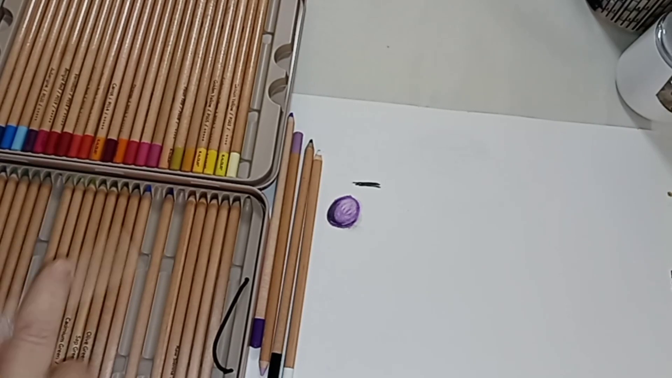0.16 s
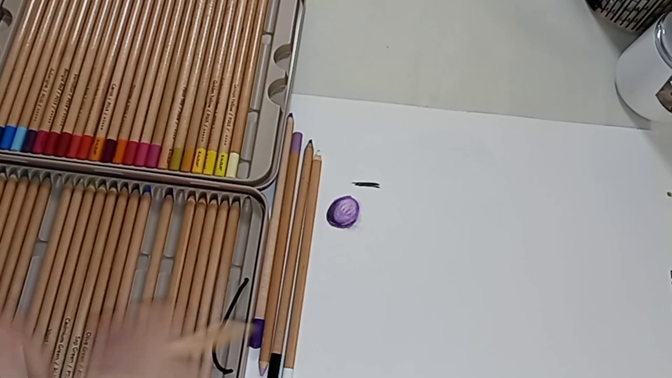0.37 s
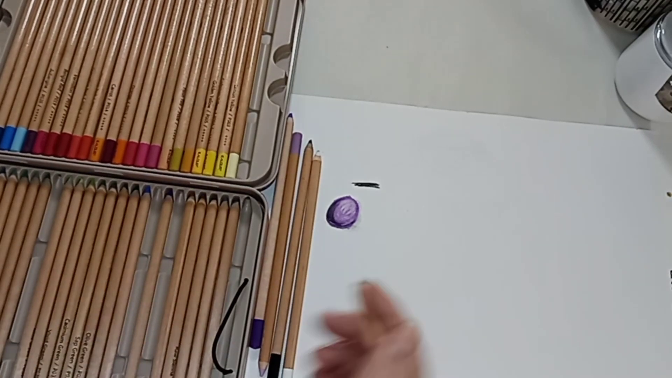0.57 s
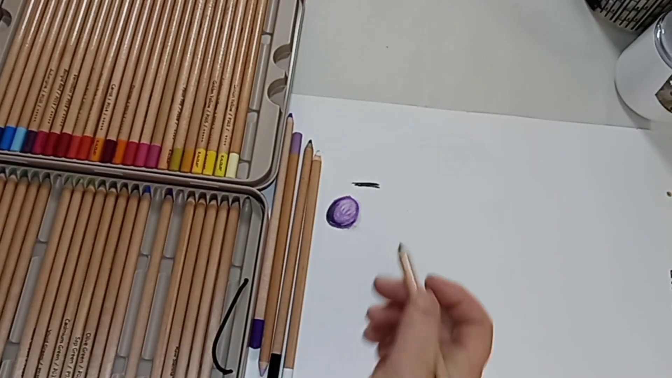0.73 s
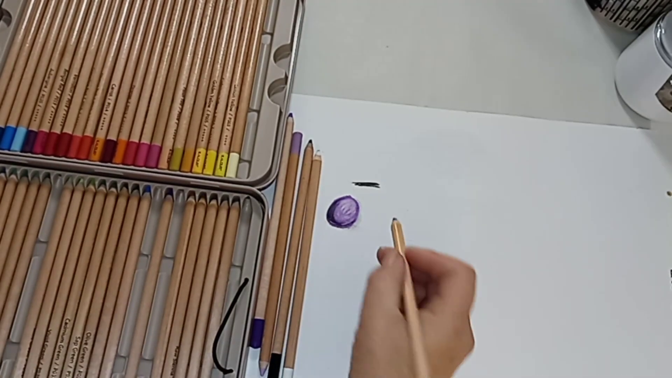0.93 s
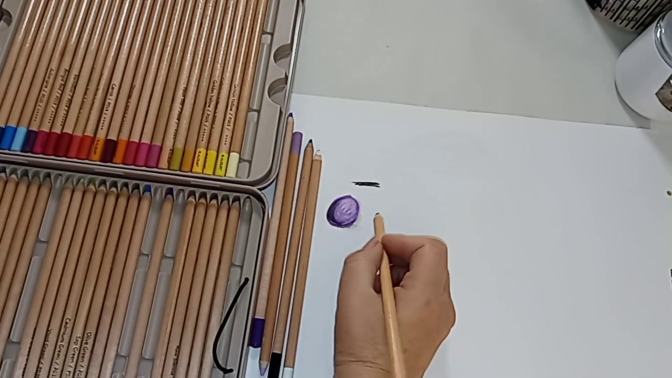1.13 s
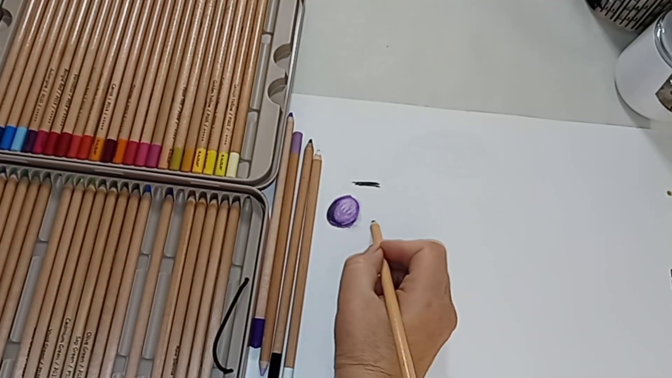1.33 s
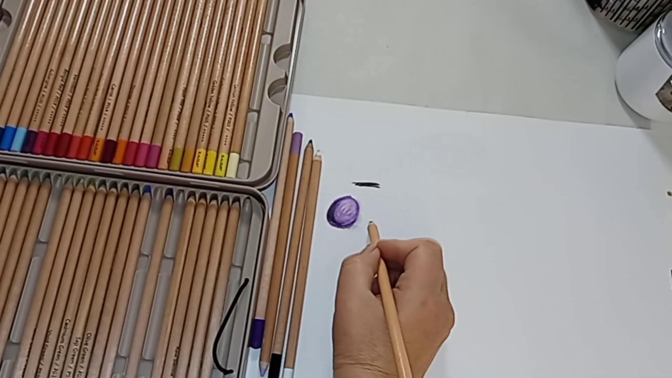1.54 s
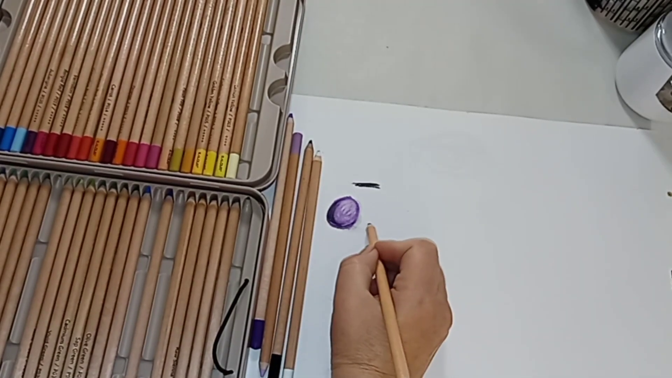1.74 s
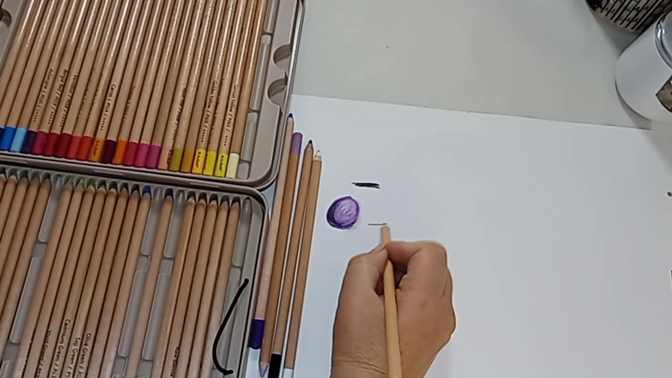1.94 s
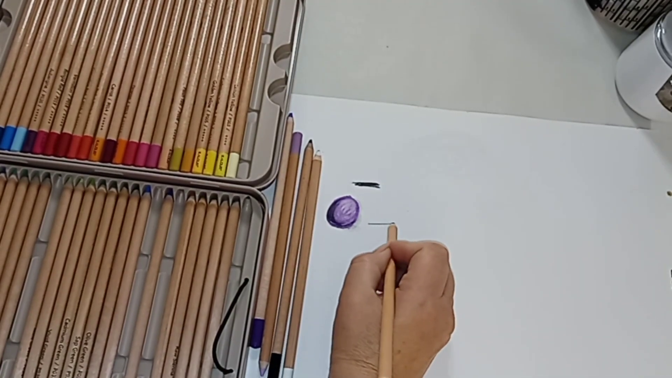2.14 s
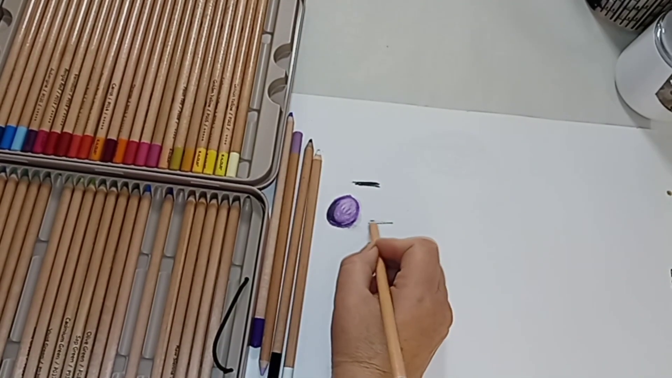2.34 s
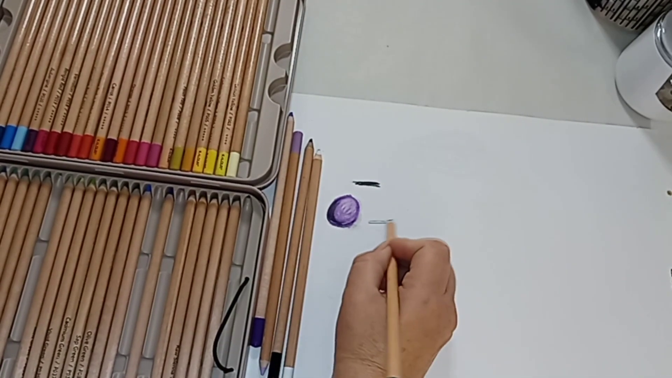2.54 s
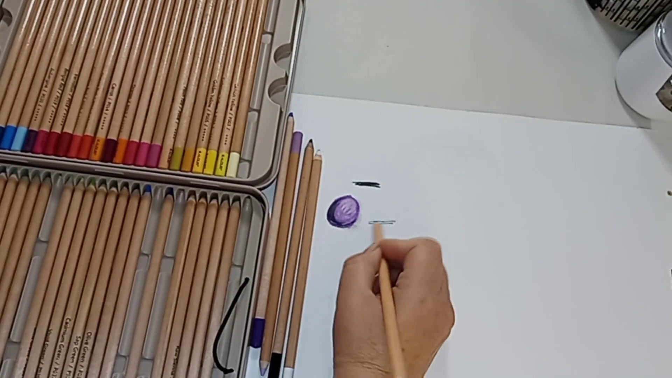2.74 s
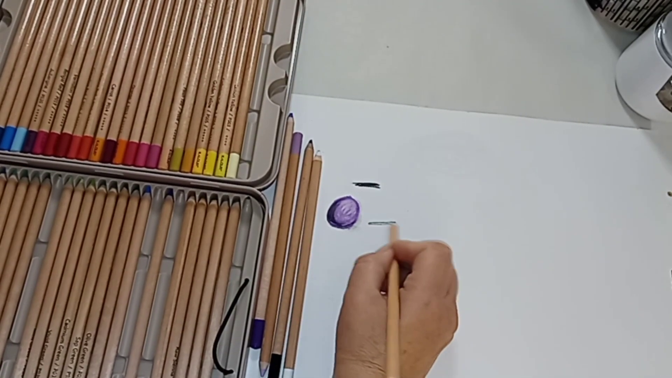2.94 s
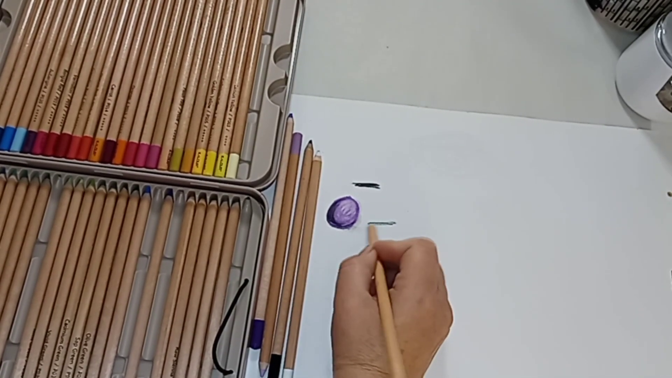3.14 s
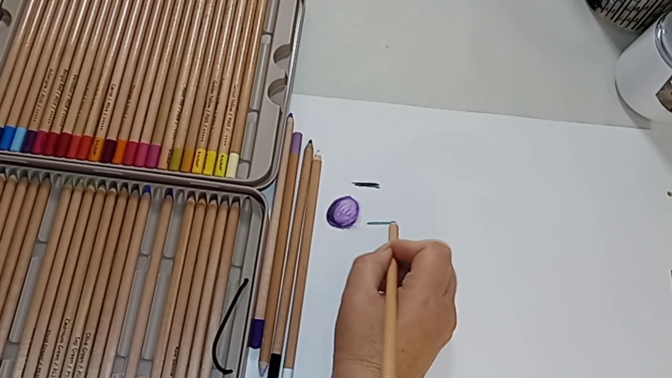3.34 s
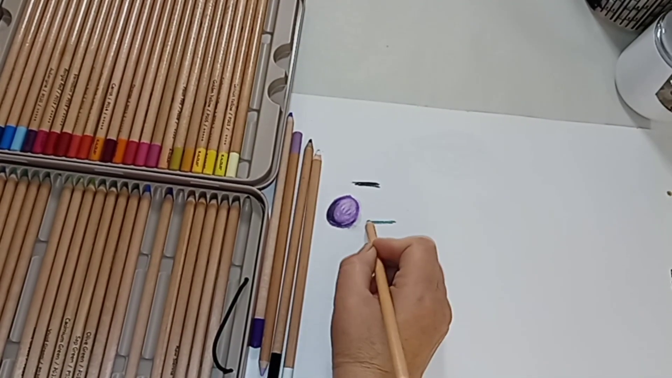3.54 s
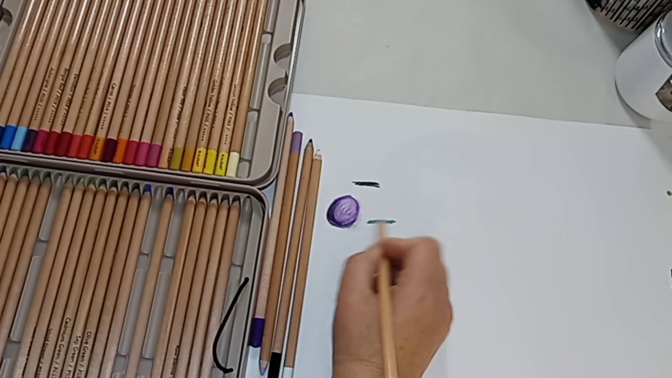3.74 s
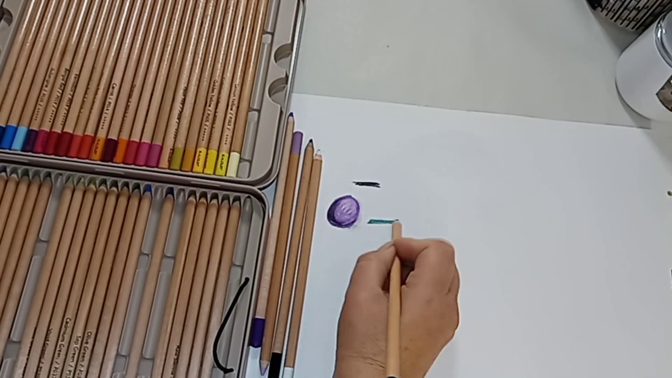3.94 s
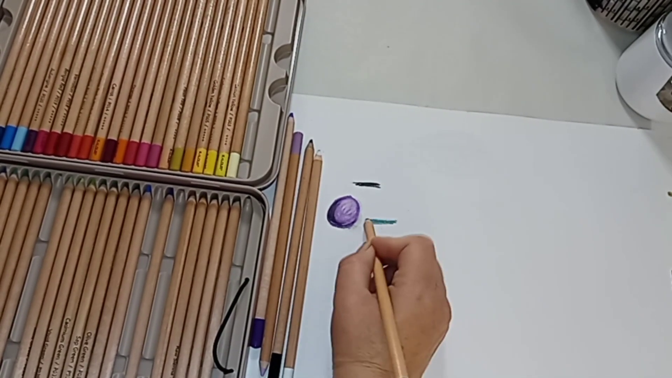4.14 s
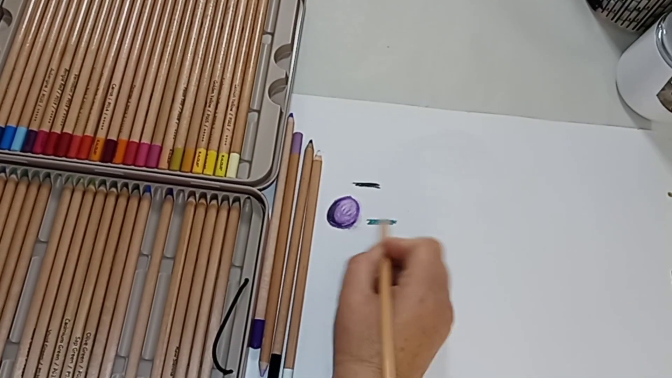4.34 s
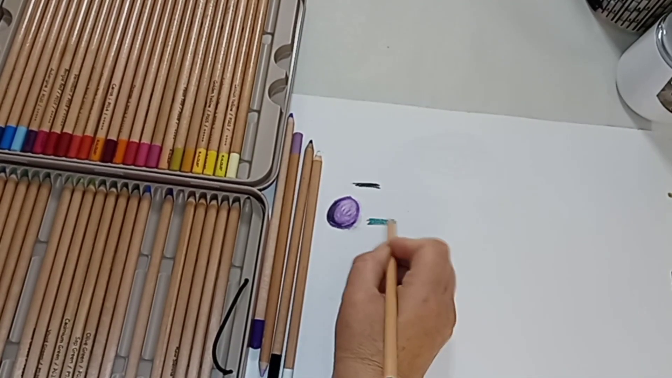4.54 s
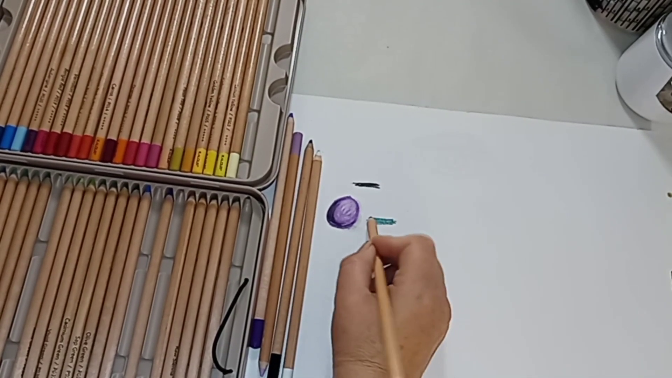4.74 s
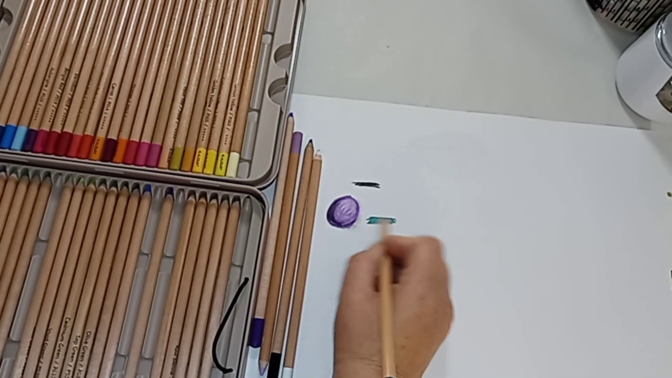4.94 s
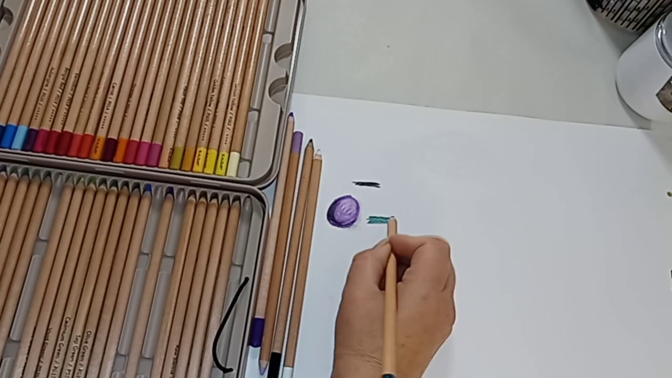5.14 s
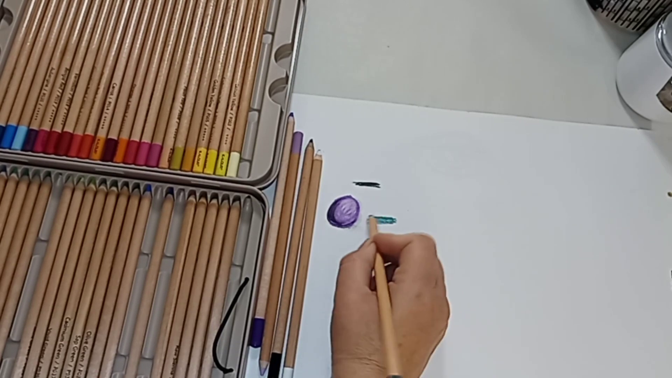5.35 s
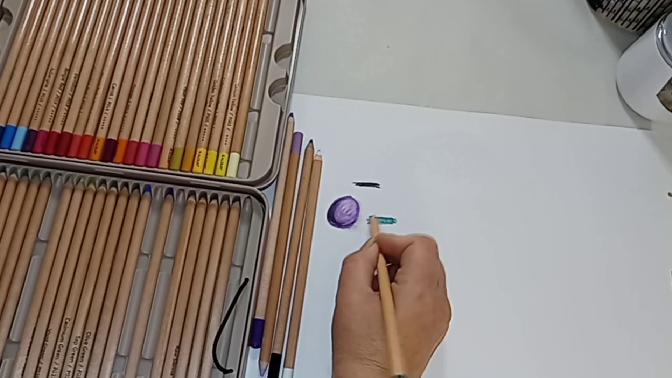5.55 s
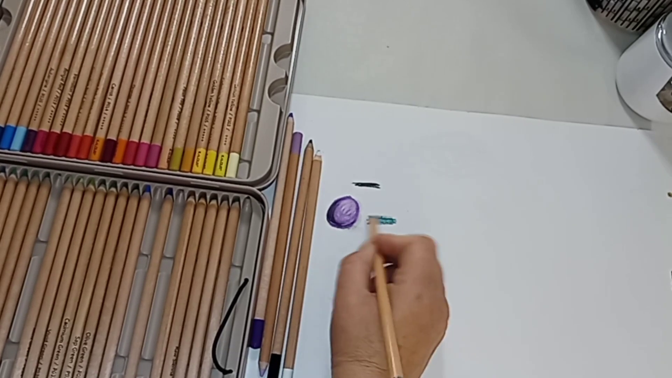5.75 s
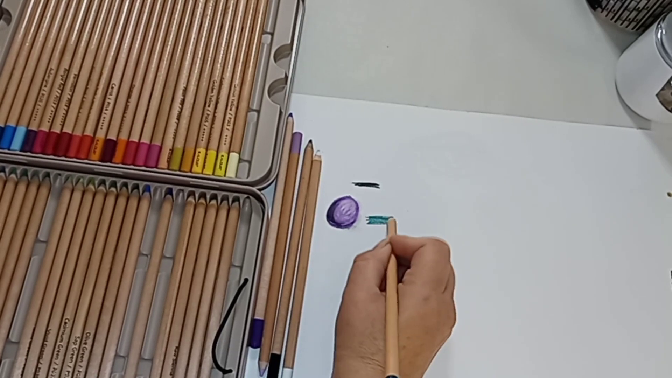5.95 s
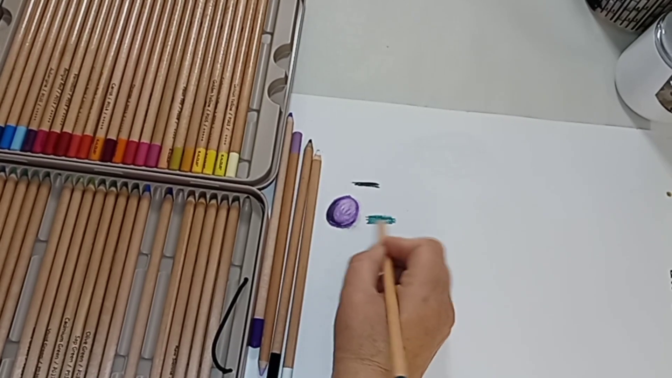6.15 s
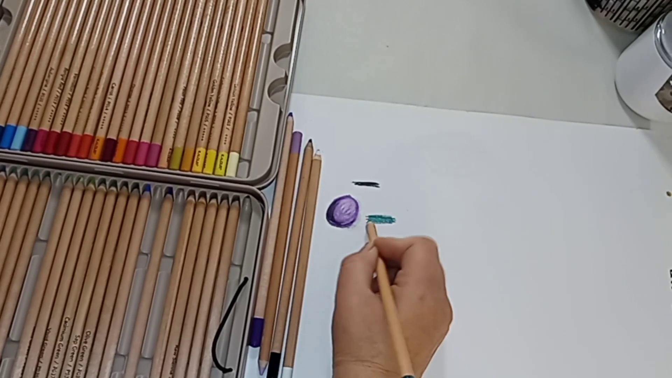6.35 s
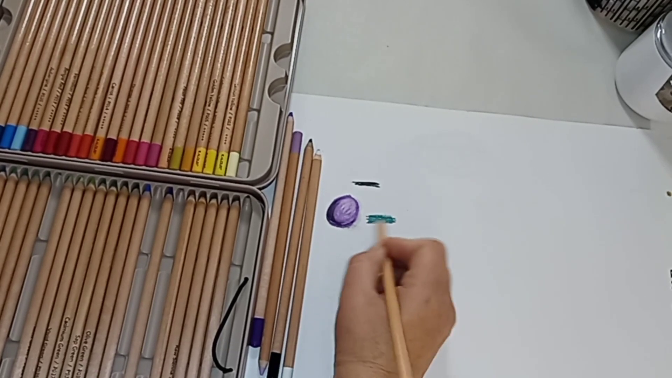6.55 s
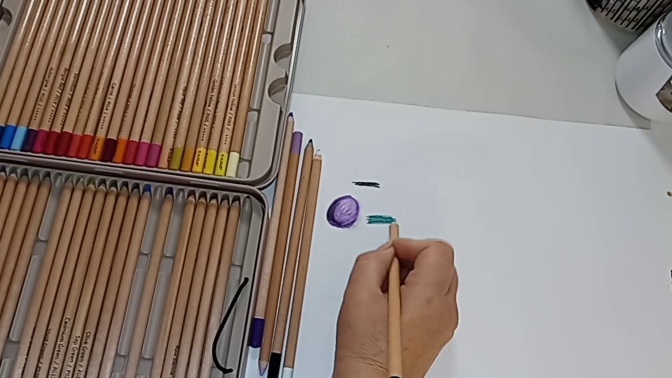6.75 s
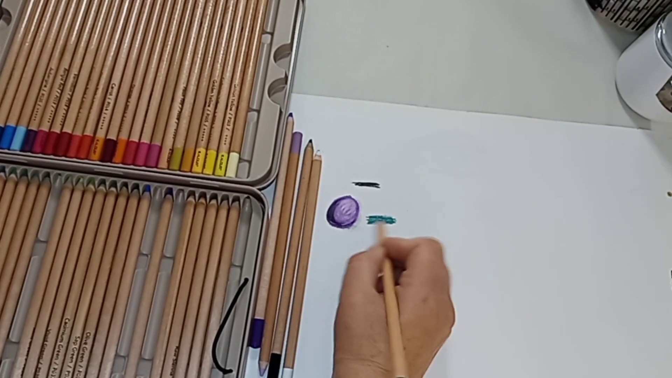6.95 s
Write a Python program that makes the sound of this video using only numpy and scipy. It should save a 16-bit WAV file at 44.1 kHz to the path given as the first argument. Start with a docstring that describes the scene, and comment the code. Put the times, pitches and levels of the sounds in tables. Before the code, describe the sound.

Pencils rattle in a metal tray before a soft pastel pencil scratches quick strokes on paper in a quiet, humming room.

```python
"""In a quiet, humming room a hand shuffles and takes a pencil from a tin, whose tray clatters and snaps.
Then the soft pastel pencil scribbles back and forth on paper on a desk. Grains of pigment tear off and
ring the wooden shaft, the sheet and the desk top. The tip scuffs as it lands or leaves, and late strokes
begin with it tapping down. A mono phone microphone hears it all."""
import sys
import numpy as np
from scipy import signal
from scipy.fft import rfft, irfft
from scipy.io import wavfile
from scipy.ndimage import uniform_filter1d

SR = 44100
rng = np.random.default_rng(int(sys.argv[2]) if len(sys.argv) > 2 else 0)


def transcribe(signal):
    """Save signal, clipped to [-1, 1], as a 16-bit WAV file at the path in sys.argv[1]."""
    frames = np.atleast_2d(signal).T
    limited = np.clip(frames, -1, 1)
    pcm = np.round(limited * 32767).astype(np.int16)
    wavfile.write(sys.argv[1], SR, pcm)


N = 312700


def undb(db):
    """Decibels to gain."""
    return 10 ** (np.asarray(db) / 20)


def unit_rms(x):
    """Scale to rms 1."""
    return x / np.sqrt(np.mean(x ** 2))


def unit_peak(x):
    """Scale to peak 1."""
    return x / np.abs(x).max()


def band(x, hz, width_hz):
    """One resonance, gain 1 at its centre."""
    q = hz / min(width_hz, 0.3 * SR)
    return signal.lfilter(*signal.iirpeak(min(hz, 0.4 * SR), q, fs=SR), x)


def ring(x, modes, twice=False):
    """A body's modes in alternating polarity; passing each twice darkens the valleys between them."""
    out = 0
    for k, (hz, width_hz, db) in enumerate(modes):
        mode = band(x, hz, width_hz)
        if twice:
            mode = band(mode, hz, width_hz)
        out = out + (-1) ** k * undb(db) * mode
    return out


def driven(force, gain, modes, twice=False):
    """Force under an envelope rings a body; gain 1 gives rms 1."""
    return ring(force * gain, modes, twice) / np.std(ring(force, modes, twice))


def wander(rate_hz):
    """Random steps, smoothed twice; spread near 1."""
    hold = int(SR / rate_hz)
    steps = np.repeat(rng.standard_normal(N // hold + 1), hold)
    return 1.63 * uniform_filter1d(uniform_filter1d(steps, hold), hold)[:N]


def grit(count, spread_db):
    """Dense random micro-impacts: most alike, a few larger."""
    impacts = rng.standard_normal(count)
    size_db = spread_db * np.minimum(rng.exponential(size=count), 4)
    return unit_rms(impacts * undb(size_db))


# Each row: frequency in Hz, relative spectral density in dB.
AIR_SPECTRUM = [(30, -13), (60, -10), (124, 6.5), (165, -12), (245, -0.5), (290, -32), (500, -10.5),
                (620, -28), (1900, -28), (3500, -35), (6200, -24), (9000, -33), (12000, -22.5),
                (16000, -20)]

def room_air(level_db=-63):
    """Room noise and a wavering hum: half-octave bands that swell together and flicker alone."""
    hz, db = np.transpose(AIR_SPECTRUM)
    bin_hz = np.maximum(np.arange(N // 2 + 1) * SR / N, 1)
    spectrum = rfft(rng.standard_normal(N)) * undb(np.interp(np.log(bin_hz), np.log(hz), db))
    swell_db = 2 * wander(2.66)
    out = np.zeros(N)
    for octave in np.arange(4.5, 14.6, 0.5):
        window = np.cos(np.pi * np.clip(np.log2(bin_hz) - octave, -0.5, 0.5)) ** 2
        out += irfft(spectrum * window, N) * undb(swell_db + 2.5 * wander(12))
    return unit_rms(out) * undb(level_db)


# Each row: frequency in Hz, width in Hz, gain in dB. Strokes and taps ring the desk too.
DESK_MODES = [(58, 7.5, -4), (115, 18.7, 1.5), (149, 28, 3.5), (243.6, 43, 2), (339.8, 33.4, 3),
              (414, 58, -7.5), (576, 36, -6.5), (758, 26, -11), (920, 150, -12)]
# Each row: time in seconds, rumble level in dB, hiss level in dB.
SHUFFLE_LEVELS = [(0, -52, -93), (0.039, -46.5, -46.5), (.1, -61.5, -92), (0.132, -48, -64),
                  (.29, -99, -100), (.366, -89.5, -88), (.792, -77.5, -79.5), (.92, -84.5, -97),
                  (.996, -59, -59), (1.182, -77, -65.5), (1.198, -67.5, -60), (1.26, -69, -69),
                  (1.362, -100, -94), (1.432, -76.5, -105), (1.474, -100, -105), (1.588, -82, -105),
                  (1.634, -90, -92), (1.748, -78, -92), (1.8, -89, -105)]

def hand_shuffle(sheen_db=-4):
    """Skin and cloth drag over tray and desk: a dull rumble, a soft hiss and a bright sheen."""
    times_s, *levels_db = np.transpose(SHUFFLE_LEVELS)
    t = np.arange(N) / SR
    rumble_db, hiss_db = (np.interp(t, times_s, db) for db in levels_db)
    friction = grit(N, 1.3) * (t < times_s[-1])
    rumble = unit_rms(ring(friction, DESK_MODES) + undb(-10) * band(friction, 850, 1370))
    hiss = unit_rms(band(band(friction, 6200, 12000), 4700, 13500))
    sheen = unit_rms(band(band(friction, 15800, 9000), 15800, 9000))
    return undb(rumble_db) * rumble + undb(hiss_db) * (hiss + undb(sheen_db) * sheen)


# Each row: frequency in Hz, width in Hz, gain in dB.
TIN_MODES = [(877, 38, 4), (1550, 40, 4.5), (2370, 29, -12), (2715, 200, 1), (3370, 25, -13), (3880, 63, 3),
             (4440, 38, -10), (4850, 47, -1), (5410, 36, -12), (5710, 29, -7), (6200, 62, -12),
             (7140, 38, 3)]
# Each row: start in seconds, peak in dB, centre in Hz, rattle T60 in seconds, rattle re crack in dB.
TIN_KNOCKS = [(0.0278, -21.5, 2670, .19, -9.5), (0.053, -34, 4430, 0.087, -3),
              (.104, -36.5, 3790, 0.089, -7), (0.1204, -26, 2540, 0.065, 5), (.1339, -31, 1290, 0.049, -23),
              (.3486, -40, 15600, 0.14, -4), (.9646, -49, 6400, .14, -10), (0.983, -31.5, 5130, .12, -11.5),
              (0.9896, -20, 3470, 0.18, -12.5), (1.194, -37.5, 3200, 0.11, -7),
              (1.686, -49, 5100, 0.092, -9.5)]

def tin_knocks(crack_s=0.0011, width_hz=5500):
    """A sharp crack, then the thin tray and loose pencils rattle out in their modes."""
    out = np.zeros(N)
    t = np.arange(SR // 2) / SR
    for start_s, peak_db, hz, t60_s, rattle_db in TIN_KNOCKS:
        hits = grit(len(t), 3.4) * (np.exp(-t / crack_s) + undb(rattle_db - 60 * t / t60_s))
        body = hits + undb(7) * ring(hits, TIN_MODES)
        knock = band(band(body, hz, width_hz), hz, width_hz) + undb(-29.5) * hits
        add(out, start_s, undb(peak_db) * unit_peak(knock))
    return out


# The pencil's high rings, its lower bending modes, and the paper over its air cushion.
# Each row: frequency in Hz, width in Hz, gain in dB.
TIP_MODES = [(3144, 650, -12.5), (4400, 1210, -7), (5286, 540, -6), (6190, 1540, -5.5), (7070, 1480, -6.5),
             (8980, 970, 0.5), (10460, 530, -7), (11800, 1570, 0.5), (14950, 2000, 1.5), (15370, 710, -12)]
SHAFT_MODES = [(1160, 485, -5.5), (1519, 87, -5.5), (1841, 386, -2.5), (2357, 244, -2), (2644, 320, -4.5)]
SHEET_MODES = [(584, 96, 8), (709, 137, 5.5), (916, 370, 2), (976, 41, 11)]
# Kinds: out, back, with a jolt, lone after a lift, a mere touch. Each row: break-away speed in dB,
# shaft share in dB, desk share in dB, drumming peak time over (push + slowing), slowing in seconds.
STROKE_KINDS = {"out": (-6.5, -10.5, -12.5, 0.86, 0.0642), "back": (-9.5, -9.5, -17, 1.2, .056),
                "jolt": (-6, -8.5, -13, 0.2, 0.0554), "lone": (-11, -10.5, -17, 1.12, 0.0643),
                "touch": (-6, -9, -19.5, 2, 0.04)}
# Each row: start in seconds, full-speed level in dB, speed-up in seconds, whole push in seconds,
# paper drumming in dB, kind.
PENCIL_STROKES = [(1.83, -48.5, 0.013, 0.29, -4, "out"), (2.258, -50, 0.021, .19, -22, "back"),
                  (2.524, -44, 0.032, 0.12, -8, "out"), (2.726, -45.5, 0.072, 0.14, -30.5, "back"),
                  (2.947, -40.5, 0.047, 0.071, -13, "out"), (3.111, -42.5, 0.043, .12, -34, "back"),
                  (3.313, -40.5, 0.049, 0.066, -14, "out"), (3.462, -42, 0.043, 0.085, -19, "back"),
                  (3.645, -40, 0.035, 0.06, -10, "jolt"), (3.783, -38.5, .063, 0.063, -28, "back"),
                  (3.957, -39.5, 0.023, 0.041, -42, "out"), (4.07, -39, 0.077, 0.083, -34, "back"),
                  (4.254, -39, .033, 0.054, -14.5, "out"), (4.399, -38.5, 0.044, 0.069, -22, "back"),
                  (4.569, -37.5, 0.025, 0.047, -6.5, "out"), (4.715, -38.5, 0.032, 0.054, -36, "back"),
                  (4.865, -38.5, 0.027, 0.043, -9.5, "out"), (4.999, -38, 0.026, 0.059, -45, "back"),
                  (5.15, -40, 0.037, 0.047, -19, "out"), (5.283, -39, 0.025, 0.055, -32, "back"),
                  (5.429, -47, .011, 0.027, -37, "touch"), (5.536, -51.5, 0.0053, 0.027, -26, "touch"),
                  (5.631, -39.5, 0.022, 0.06, -4, "jolt"), (5.86, -59, .003, 0.0027, -26, "touch"),
                  (5.895, -40, 0.065, 0.087, -11.5, "lone"), (6.18, -39, 0.063, 0.074, -11, "lone"),
                  (6.329, -51, 0.0074, 0.007, -26, "touch"), (6.445, -38.5, 0.056, 0.075, -10.5, "lone"),
                  (6.712, -38, 0.04, 0.068, -17.5, "lone"), (6.988, -39, 0.037, 0.071, -4, "lone")]

def pencil_strokes(creep_s=0.007, usual_db=-41, drum_width=0.24, drag_db=-21):
    """The tip creeps, breaks free, speeds up and slows; its grains ring tip, shaft, sheet and desk."""
    sheen_gain, tip_gain, shaft_gain, desk_gain, sheet_gain = np.zeros((5, N))
    t = np.arange(SR // 2) / SR - creep_s
    for start_s, db, rise_s, push_s, drum_db, kind in PENCIL_STROKES:
        break_db, shaft_db, desk_db, drum_at, slow_s = STROKE_KINDS[kind]
        desk_db += 0.36 * (usual_db - db)  # the desk keeps a larger share of quiet strokes
        speed_db = break_db * np.clip(1 - t / rise_s, 0, 1) ** 2
        speed_db -= 20 * np.clip((t - push_s) / slow_s, 0, 9) ** 1.5
        # A slower tip sounds duller; a larger body takes up the motion later.
        sheen_level = undb(db + 1.31 * speed_db)
        tip_level = undb(db + 0.99 * speed_db)
        shaft_level = undb(db + shaft_db + 0.79 * speed_db)
        desk_level = undb(db + desk_db + 0.63 * speed_db)
        buckling = np.exp(-((t / (push_s + slow_s) - drum_at) / drum_width) ** 2)
        sheet_level = buckling * undb(db + drum_db + 0.18 * speed_db)
        sheet_level += undb(db + drag_db + 0.35 * speed_db)
        for gain, level, wake_s in ((sheen_gain, sheen_level, 0.011), (tip_gain, tip_level, 0.012),
                                    (shaft_gain, shaft_level, 0.022), (desk_gain, desk_level, 0.03),
                                    (sheet_gain, sheet_level, 0.03)):
            grip = np.clip((t + creep_s) / wake_s, 0, 1) ** 2
            add(gain, start_s - creep_s, grip * level)
    # The paper's tooth makes the drag uneven.
    grains = grit(N, 1.9) * undb(wander(60) + 0.64 * wander(400))
    sheen = driven(grains, sheen_gain, TIP_MODES[5:], twice=True)
    tip = driven(-grains, tip_gain * undb(1.2 * wander(40)), TIP_MODES[:5], twice=True)
    shaft = driven(grains, shaft_gain * undb(1.1 * wander(25)), SHAFT_MODES, twice=True)
    sheet = driven(grains, sheet_gain * undb(2.4 * wander(80)), SHEET_MODES, twice=True)
    # The heavy desk answers unevenly, with its low modes only.
    desk_gain = uniform_filter1d(desk_gain, SR // 50) * undb(3 * wander(25))
    desk = driven(grains, desk_gain, DESK_MODES[:6])
    pencil = undb(-0.66) * sheen + undb(-7.5) * tip + undb(-1.1) * shaft
    return pencil + undb(-4) * sheet + undb(-3) * desk


# Each row: start in seconds, level in dB.
TIP_SCUFFS = [(2.107, -62), (5.619, -49), (5.7624, -44), (6.056, -41.5), (6.14, -50.5), (6.4074, -45.5),
              (6.592, -40), (6.68, -49), (6.861, -50), (6.958, -44)]

def tip_scuffs(rise_s=0.0039, decay_s=0.0065):
    """The tip grazes the paper as it lands or leaves, ringing the pencil."""
    out = np.zeros(N)
    t = np.arange(SR // 10) / SR
    envelope = np.clip(t / rise_s, 0, 1) * np.exp(-t / decay_s)
    for start_s, db in TIP_SCUFFS:
        graze = unit_rms(ring(grit(len(t), 3.2), TIP_MODES, twice=True))
        add(out, start_s, undb(db) * graze * envelope)
    return out


# Each row: start in seconds, thud peak in dB.
TIP_TAPS = [(4, -57), (4.897, -45.5), (5.536, -40), (5.867, -50.5), (6.143, -36), (6.411, -40),
            (6.684, -28), (6.96, -26)]

def tip_taps(judder_s=0.03, tick_s=0.0056, tick_db=-19.5):
    """The landing tip pushes the desk, more briefly when harder, and judders; shaft and sheet tick."""
    out = np.zeros(N)
    t = np.arange(SR // 4) / SR
    for start_s, db in TIP_TAPS:
        contact_s = 0.00057 * undb(-0.4 * (db + 41))
        push = (t / contact_s) ** 2 * np.exp(-t / contact_s)
        bounces = rng.standard_normal(len(t)) * np.exp(-t / judder_s)
        judder = np.convolve(bounces, push[:SR // 50])[:len(t)]
        # A small spot of the board radiates its change of motion, so deep bass stays weak.
        thud = np.gradient(ring(push + undb(-30.5) * judder, DESK_MODES[2:]))
        burst = rng.standard_normal(len(t)) * t * np.exp(-t / tick_s)
        tick = ring(burst, SHAFT_MODES + SHEET_MODES)
        add(out, start_s, undb(db) * (unit_peak(thud) + undb(tick_db) * unit_peak(tick)))
    return out


def add(out, start_s, x):
    """Mix x into out from start_s."""
    i = max(int(start_s * SR), 0)
    out[i:i + len(x)] += x[:N - i]


ROOM_T60_S, ROOM_GAP_S, ROOM_DB = 0.13, 0.004, -8

def scene():
    """Desk sounds with a small room's short tail, over the room noise."""
    near = pencil_strokes() + tip_taps() + tip_scuffs() + tin_knocks() + hand_shuffle()
    t = np.arange(SR // 3) / SR
    tail = rng.standard_normal(len(t)) * undb(-60 * t / ROOM_T60_S) * (t > ROOM_GAP_S)
    reverb = signal.fftconvolve(near, tail / np.linalg.norm(tail))[:N]
    mono = near + undb(ROOM_DB) * reverb + room_air()
    return np.array([mono, mono])


LOW_CUT_HZ, HIGH_CUT_HZ = 50, 15720
PORT_HZ, PORT_WIDTH_HZ, PORT_DEPTH = 7750, 900, 0.62

def record(dry):
    """The phone drops the deep bass, dips at its port's notch and cuts the top."""
    thinned = signal.sosfilt(signal.butter(2, LOW_CUT_HZ, "high", fs=SR, output="sos"), dry)
    notched = thinned - PORT_DEPTH * band(thinned, PORT_HZ, PORT_WIDTH_HZ)
    return signal.sosfilt(signal.ellip(12, 0.2, 70, HIGH_CUT_HZ, fs=SR, output="sos"), notched)


dry = scene()
out = record(dry)
transcribe(out)
```